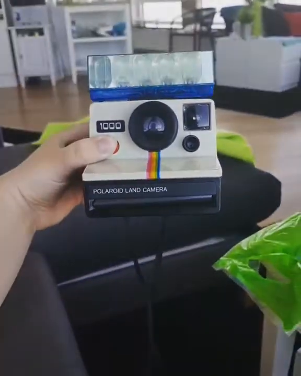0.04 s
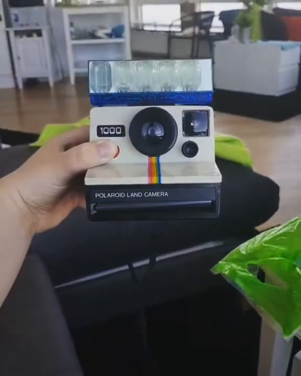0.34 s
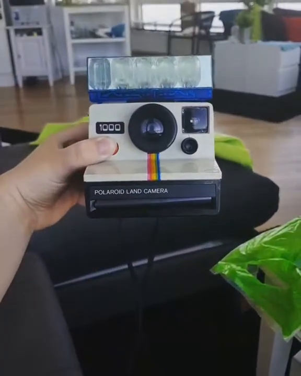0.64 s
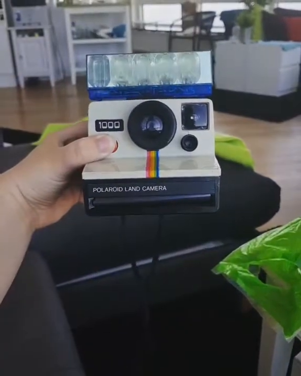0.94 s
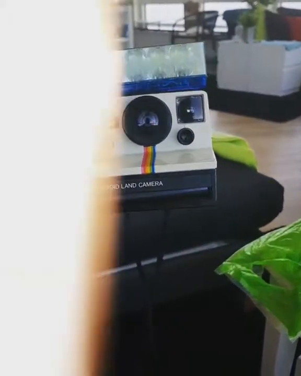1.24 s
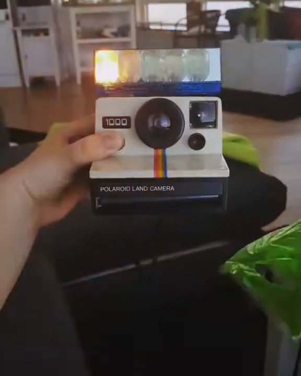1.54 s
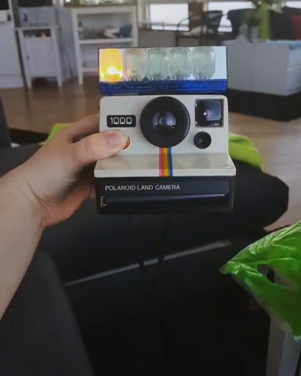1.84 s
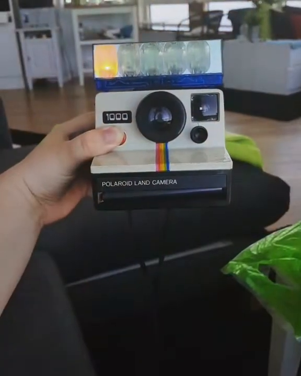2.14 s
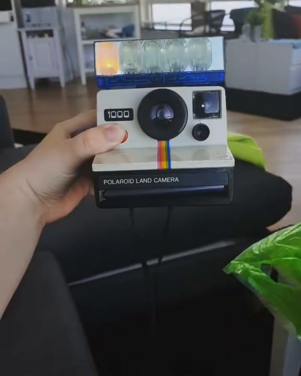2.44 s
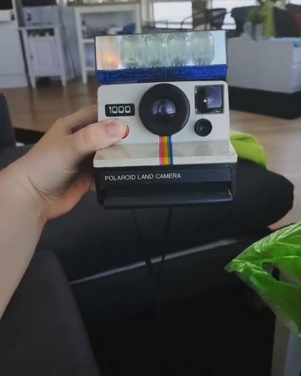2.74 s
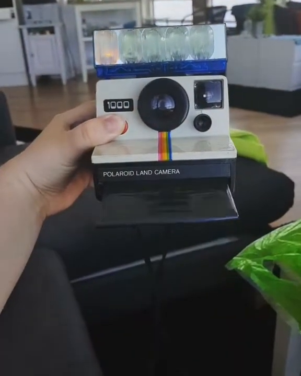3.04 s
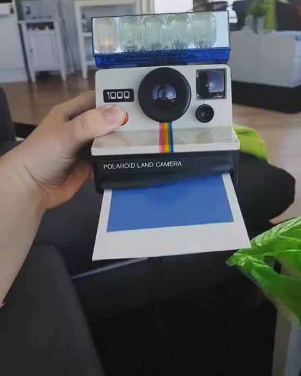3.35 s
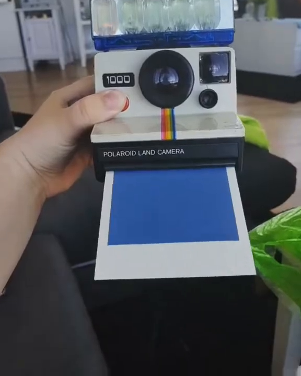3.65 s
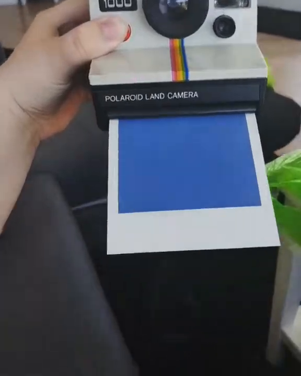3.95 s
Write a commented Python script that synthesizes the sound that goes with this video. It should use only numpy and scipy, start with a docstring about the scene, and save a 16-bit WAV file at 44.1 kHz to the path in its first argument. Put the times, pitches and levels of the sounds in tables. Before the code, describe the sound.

An instant camera's shutter snaps in a quiet room, and its small motor whirs at once with rattling plastic gears. It clacks, labours as the print rolls out, then winds down with more clacks, heard from arm's length.

```python
"""A quiet living room: an instant camera, held at arm's length, takes a picture and ejects the print.
A finger presses the button and the shutter snaps open and shut. A small three-pole motor spins up,
humming and rattling its plastic gear train, labours as the rollers grip the print, and coasts to a
stop while levers clack and a return spring rings in the case."""
import sys
import numpy as np
from scipy import signal
from scipy.fft import rfft, irfft
from scipy.io import wavfile
from scipy.ndimage import uniform_filter1d

SR = 44100
rng = np.random.default_rng(int(sys.argv[2]) if len(sys.argv) > 2 else 0)


def file_out(sig):
    """Save sig as 16-bit WAV at sys.argv[1]."""
    # one column per channel
    cols = np.atleast_2d(sig).T
    # limit, then scale
    lim = np.clip(cols, -1, 1)
    pcm = np.round(lim * 32767).astype(np.int16)
    wavfile.write(sys.argv[1], SR, pcm)


N = 176400

# the motor's run (time [s], shaft speed [turns/s])
SHAFT_SPEED = [(1.36, 105), (1.408, 156), (1.448, 193), (1.502, 210), (1.542, 212), (1.91, 208),
               (2.0, 205.5), (2.1, 203), (2.3, 198.6), (2.36, 179), (2.42, 172), (2.47, 155), (2.55, 179.5),
               (2.62, 180.5), (2.824, 182), (3.028, 188.3), (3.18, 195), (3.39, 193), (3.455, 140),
               (3.5, 170), (3.535, 166), (3.59, 130), (3.74, 45)]
# how hard the drive works (time [s], gear level [dB], load [0-1])
DRIVE_EFFORT = [(1.3, -90, 0), (1.35, -7, 0.3), (1.385, 5, 0.04), (1.42, 5, 0.01), (1.47, 0, 0.03),
                (1.65, 1.5, 0), (2.28, 3, 0.03), (2.36, .5, 0.49), (2.53, -0.5, 0.5), (2.66, 0.5, 0.97),
                (2.9, 0, 1), (3.1, -0.5, 0.97), (3.39, -0.5, 0.99), (3.45, -9.5, 1), (3.5, -3.5, 0.08),
                (3.58, -3.5, 0.2), (3.63, -8.5, 0), (3.72, -10, 0.03), (3.76, -43.5, 0.05)]
# stereo image (frequency [Hz], left minus right [dB], left phase lead [rad], likeness [0-1])
STEREO_IMAGE = [(100, 2, 1, 0.93), (350, -2.5, -1.48, .97), (650, -2, 1.32, 0.99), (1240, 2, 1.68, 0.98),
                (2300, -2.5, 2, 0.21), (3830, -4.5, 3.5, .9), (5300, 1.5, 6.5, 0.4), (8300, 4, 9.5, 0.1),
                (11000, 6, 12.5, 0), (15100, 3.5, 18, 0.2)]


def undb(db):
    """Decibels to gain."""
    return 10 ** (np.asarray(db) / 20)


def unit(x):
    """Scale to rms 1."""
    return x / np.sqrt(np.mean(x ** 2))


def curve(table, column=1):
    """One column of a table, joined by straight lines in time."""
    rows = np.array(table, float)
    return np.interp(np.arange(N) / SR, rows[:, 0], rows[:, column])


def by_freq(table, column=1):
    """One column of a table, joined by straight lines in log frequency."""
    rows = np.array(table, float)
    return np.interp(np.log(np.fft.rfftfreq(N, 1 / SR) + 1), np.log(rows[:, 0]), rows[:, column])


def colour(x, table):
    """Minimum-phase EQ from a table of (frequency [Hz], gain [dB])."""
    cepstrum = irfft(np.log(undb(by_freq(table))), N)
    cepstrum[1:N // 2] *= 2
    cepstrum[N // 2 + 1:] = 0
    return irfft(rfft(x) * np.exp(rfft(cepstrum)), N)


def drift(rate_hz):
    """Smooth random modulation at rms 1."""
    hold = int(SR / rate_hz)
    steps = np.repeat(rng.standard_normal(N // hold + 1), hold)
    return unit(uniform_filter1d(uniform_filter1d(steps, hold), hold)[:N])


def convolve(x, response):
    """Pass a sound through the first second of an impulse response."""
    return signal.fftconvolve(np.atleast_2d(x), response[:, :SR], axes=1)[:, :N]


def room_tone():
    """A bed of low rumble and thin hiss, nearly mono."""
    # colour of the quiet room (frequency [Hz], gain [dB])
    air_eq = [(20, -7.5), (70, -2), (130, -5.5), (180, -10.5), (262, -18.5), (350, -16.5), (430, -22),
              (500, -17.5), (660, -25), (760, -32.5), (1100, -34.5), (2000, -36.5), (4700, -42.5),
              (13000, -42.5), (16000, -49.5)]
    # its fader (time [s], level [dB])
    fader = [(0, -62.5), (.65, -63.5), (.8, -61), (1.3, -64), (3.7, -72.5), (4, -73)]
    mid, side = (unit(colour(rng.standard_normal(N), air_eq)) for _ in range(2))
    return undb(curve(fader) + drift(11)) * (mid + undb(-15) * side * np.array([[1], [-1]]))


def room_reverb(x, wet_db=-12, build_s=0.0027):
    """Soft reflections off the walls, dying sooner in the treble."""
    # decay of the room (frequency [Hz], t60 [s])
    decays = [(200, 0.43), (1000, 0.46), (3000, 0.43), (8000, .34), (16000, .22)]
    t = np.arange(N) / SR
    noise, response = rfft(rng.standard_normal((2, N))), 0
    for hz, t60 in decays:
        band = by_freq([(f, float(f == hz)) for f, _ in decays])
        response += irfft(noise * band, N) * np.exp(-np.log(1000) * t / t60)
    response *= 1 - np.exp(-t / build_s)
    return undb(wet_db) * convolve(x, unit(response) / np.sqrt(N))


def button(decay_s=0.035):
    """A finger presses the release button: three faint, dull rubs."""
    # colour of the rub (frequency [Hz], gain [dB])
    rub_eq = [(200, -13), (600, -2), (1600, -4), (2500, -5), (3200, -28.5), (16000, -27)]
    presses = [(1.104, -61.5), (1.186, -63.5), (1.222, -68)]  # (time [s], level [dB])
    t = np.arange(N) / SR
    envelope = sum(undb(db) * (t > at) * np.exp(-np.abs(t - at) / decay_s) for at, db in presses)
    return envelope * unit(colour(rng.standard_normal(N), rub_eq))


def spring(release_s=3.411, level_db=-32):
    """The return spring is let go and rings on with the case."""
    # ringing modes (frequency [Hz], relative level [dB], t60 [s])
    modes = [(48, -14, 0.16), (95, -13, 0.087), (244.6, -4, 0.085), (468, -7.5, 0.53), (930, -19.5, 0.53),
             (2040, -2.5, 0.26), (2086, 3, 0.4), (3007, -27, 1.2), (3140, -30.5, 1.2), (4590, -6.5, 0.2)]
    t = np.maximum(np.arange(N) / SR - release_s, 0)
    return sum(undb(level_db + db) * np.exp(-np.log(1000) * t / t60) * np.sin(2 * np.pi * hz * t)
               for hz, db, t60 in modes)


def grit():
    """Stereo contact noise: narrow in the bass, wider in the treble."""
    noise = rfft(rng.standard_normal((3, N)))
    likeness = np.clip(by_freq(STEREO_IMAGE, column=3), 0, 1)
    return irfft(np.sqrt(likeness) * noise[0] + np.sqrt(1 - likeness) * noise[1:], N)


def case_ring(x, decay_s=0.013, level_db=-16):
    """The struck case rings briefly: a dense, fast-dying tail."""
    tail = rng.standard_normal((2, N)) * np.exp(-np.minimum(np.arange(N) / SR / decay_s, 60))
    tail /= np.sqrt(np.sum(tail ** 2, axis=1, keepdims=True))
    return undb(level_db) * convolve(x, tail)


def frame_resonance(x):
    """The case and gear frame favour some narrow bands and swallow others."""
    # peaks and dips (frequency [Hz], width [Hz], gain [dB])
    resonances = [(446, 40, 2.5), (785, 32, 3), (903, 13, 5), (1145, 50, -8), (1546, 120, -9),
                  (1669, 22, 5), (1984, 30, 4), (2194, 35, 3), (2605, 70, 4), (3757, 210, -6.5),
                  (4770, 50, 2), (7573, 45, 4), (7710, 45, 6.5), (9300, 200, 1), (12400, 330, 3.5)]
    for hz, width, db in resonances:
        x = x + (undb(db) - 1) * signal.lfilter(*signal.iirpeak(hz, hz / width, fs=SR), x)
    return x


def clacks(bass_hz=1080, treble_hz=3930):
    """Shutter and levers slide home, each in a short gritty burst that rings the case."""
    # shutter and lever hits (time [s], bass [dB], mid [dB], treble [dB], rise [ms], decay [ms])
    hits = [(1.2677, -34, -20.5, -23.5, 1.8, 2.7), (1.2786, -34.5, -23.5, -37, 1.5, 4.4),
            (1.308, -42.5, -40, -39, 6.9, 12), (1.333, -32, -37, -35, 2.3, 4.6),
            (1.3373, -31, -19.5, -22.5, 0.45, 5), (1.3826, -35.5, -20.5, -28, 0.41, 1.8),
            (2.5616, -22.5, -16, -17, 0.29, 1.4), (2.5634, -20, -20, -22.5, 0.83, 2.7),
            (2.571, -19, -33, -25, 1, 9.2), (2.979, -32, -21.5, -41, 0.8, 2.6),
            (3.3997, -30, -21, -10.5, 1.5, 2.3), (3.405, -36, -32, -23.5, 2, 4.7),
            (3.4123, -24, -12.5, -10, 0.36, 1.4), (3.4176, -32.5, -21, -38, .5, 4),
            (3.4735, -22.5, -27, -30, 2, 6.4), (3.5935, -31.5, -18.5, -25, .7, 3.5)]
    # colour of a blow on the plastic case (frequency [Hz], gain [dB])
    case_eq = [(60, -31.5), (200, -14.5), (330, 2), (480, 3), (650, -3), (880, 5.5), (1300, 3.5),
               (1550, 4.5), (2000, 5.5), (2700, 4), (3800, -2.5), (4800, -2), (6500, -9.5), (11000, -10.5),
               (16000, -15.5)]
    rub = colour(grit(), case_eq)
    crossover = [(bass_hz, "low"), ([bass_hz, treble_hz], "band"), (treble_hz, "high")]
    bands = np.array([unit(signal.sosfilt(signal.butter(2, hz, kind, fs=SR, output="sos"), rub))
                      for hz, kind in crossover])
    t, bursts = np.arange(N) / SR, np.zeros((2, N))
    for at, bass_db, mid_db, treble_db, rise_ms, decay_ms in hits:
        span = slice(int((at - .02) * SR), int((at + .06) * SR))
        ms = (t[span] - at) * 1000
        envelope = np.exp(np.minimum(ms / rise_ms, -ms / decay_ms))
        gains = undb([bass_db, mid_db, treble_db]) * [1, -1, 1]  # flipped mid avoids crossover notches
        bursts[:, span] += envelope * np.tensordot(gains, bands[:, :, span], 1)
    return bursts + case_ring(bursts)


def partials(turns, orders, waver_db=1.5, backlash_turns=.003):
    """Wavering tones locked to the shaft; play in the gears blurs the higher ones."""
    tones = 0
    for order, db in orders:
        gain = undb(db + waver_db * drift(25))
        cycles = order * (turns + backlash_turns * drift(150)) + rng.random()
        tones += gain * np.sin(2 * np.pi * cycles)
    return np.sqrt(2) * tones


def squeal(turns, peak_s=2.42, width_s=0.032, level_db=-35.5):
    """One short squeal that follows the shaft's pitch."""
    # its tones (multiple of shaft speed [x], relative level [dB])
    orders = [(12, 0.5), (13.6, -3), (18, -5), (27, -1)]
    swell = np.exp(-((np.arange(N) / SR - peak_s) / width_s) ** 2)
    return undb(level_db) * swell * partials(turns, orders)


def pinion_whine(turns, load, teeth, level_db=-40):
    """Under load the pinion sings at its tooth rate and the octave above."""
    gain = np.sqrt(load) * undb(level_db + curve(DRIVE_EFFORT))
    return gain * partials(turns, [(teeth, 0), (2 * teeth, -6)])


def roller_whine(turns):
    """The roller gears whine as they pull the print through."""
    # fader of the whine (time [s], level [dB])
    fader = [(2.26, -110), (2.31, -44), (2.36, -45), (2.5, -48.5), (2.66, -48.5), (2.9, -46.5),
             (3.03, -39.5), (3.38, -39), (3.44, -51.5), (3.55, -100)]
    # gear tones (multiple of shaft speed [x], relative level [dB])
    orders = [(1.74, -17), (2.075, -2.5), (2.664, -4), (3.477, -11.5), (4.15, -0.5), (4.99, -2),
              (6.235, -3.5), (6.85, -7.5), (13.85, -15)]
    return undb(curve(fader)) * partials(turns, orders)


def motor_hum(turns):
    """The motor hums, strongest at the rate of its three poles."""
    # fader of the hum (time [s], level [dB])
    fader = [(1.33, -110), (1.37, -48), (1.405, -32.5), (1.45, -43), (1.54, -34.5), (1.9, -34.5),
             (2.305, -36), (2.33, -49), (2.42, -42), (2.48, -52.5), (3.38, -51), (3.45, -47.5),
             (3.52, -40.5), (3.585, -40), (3.62, -59.5), (3.75, -100)]
    # motor tones (multiple of shaft speed [x], relative level [dB])
    orders = [(1, -24.5), (2, -17.5), (3, -1.5), (4, -14), (5, -8.5), (6, -4), (6.5, -10.5), (7, -11),
              (8, -9.5), (9, -7.5), (10, -16)]
    return undb(curve(fader)) * partials(turns, orders)


def knocks(cycles, scatter_db, decay_s=.0004):
    """Envelope of one short impact of random size at each whole cycle."""
    sizes, impacts = undb(scatter_db * rng.standard_normal(N)), np.zeros(N)
    at = np.flatnonzero(np.diff(np.floor(cycles)) > 0)
    impacts[at] = sizes[:len(at)]
    return unit(signal.lfilter([1], [1, -np.exp(-1 / (decay_s * SR))], impacts))


def gear_rattle(turns, load, teeth, free_db=-33.5, loaded_db=-28.5):
    """Poles, shaft play and teeth knock on the case; load makes it brighter and adds a roller throb."""
    # colour of the gears running free (frequency [Hz], gain [dB])
    free_eq = [(100, -31), (200, -24), (300, -22.5), (370, -27.5), (480, -7.5), (580, -13.5), (750, 2),
               (870, -9), (960, -6), (1130, -6.5), (1350, 3.5), (1530, -9.5), (1750, -1.5), (2200, -8.5),
               (2700, -8), (3200, -11), (3750, -17), (4500, -10), (5200, -19), (6400, -24.5), (7600, -27.5),
               (8600, -20), (10300, -21), (12500, -23), (14500, -27.5), (15800, -40)]
    # colour of the gears under load (frequency [Hz], gain [dB])
    loaded_eq = [(100, -28), (200, -21.5), (300, -24), (370, -15.5), (480, -11.5), (580, -15), (750, -8.5),
                 (870, -5), (960, 0.8), (1130, -7.5), (1350, 0.5), (1530, -3), (1750, -4.6), (2200, -3.5),
                 (2700, -3), (3200, -4.5), (3750, -10.5), (4500, -7), (5200, -10.5), (6400, -19),
                 (7600, -18.5), (8600, -20.0), (10300, -16.0), (12500, -18.5), (14500, -24), (15800, -37)]
    poles = undb(-1) * knocks(3 * turns, scatter_db=1.5)
    shaft_play = undb(-12.5) * knocks(turns, scatter_db=1.5)
    ticks = undb(-4) * knocks(teeth * turns, scatter_db=2)
    thud = colour((poles + shaft_play) * grit(), [(2500, -0.5), (6000, -6)])
    scrape = undb(1 + drift(90))
    force = colour(thud + (ticks + scrape) * grit() / 2, [(2500, 0), (6000, 3.5)])
    roller_ratio, throb_depth = 0.52, 0.16
    throb = 1 + throb_depth * np.cos(2 * np.pi * roller_ratio * turns)
    free = undb(free_db) * np.sqrt(1 - load) * unit(colour(force, free_eq))
    loaded = undb(loaded_db) * np.sqrt(load) * unit(colour(force * throb, loaded_eq))
    rattle = undb(curve(DRIVE_EFFORT)) * (free + loaded)
    # slow gears knock softly: the treble opens fully at 210 turns/s
    brightness = np.clip(curve(SHAFT_SPEED) / 210, 0, 1) ** 2
    dull = signal.sosfilt(signal.butter(1, 2200, fs=SR, output="sos"), rattle)
    return dull + brightness * (rattle - dull)


def scene():
    """One shaft drives whines and rattle; camera and reverb are spread in stereo over the room tone."""
    flutter, pinion_teeth = 0.0037, 12
    turns = np.cumsum(curve(SHAFT_SPEED) * (1 + flutter * drift(35))) / SR
    load = np.clip(curve(DRIVE_EFFORT, column=2), 0, 1)
    tones = pinion_whine(turns, load, pinion_teeth) + squeal(turns)
    tones += motor_hum(turns) + roller_whine(turns)
    clatter = frame_resonance(gear_rattle(turns, load, pinion_teeth) + clacks())
    camera = tones + clatter + spring() + button()
    sides = np.array([[1], [-1]]) / 2
    pan = undb(sides * by_freq(STEREO_IMAGE))
    phase_lead = np.exp(1j * sides * by_freq(STEREO_IMAGE, column=2))
    return irfft(rfft(camera + room_reverb(camera)) * pan * phase_lead, N) + room_tone()


def record(dry):
    """Clip at full scale, then cut the top steeply at 15.9 kHz."""
    high_cut = signal.ellip(10, .2, 80, 15900, fs=SR, output="sos")
    return signal.sosfilt(high_cut, np.clip(dry, -1, 1))


dry = scene()
out = record(dry)
file_out(out)
```